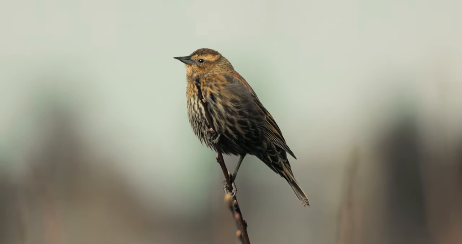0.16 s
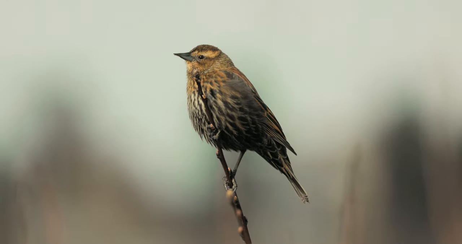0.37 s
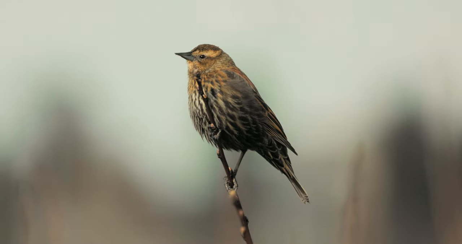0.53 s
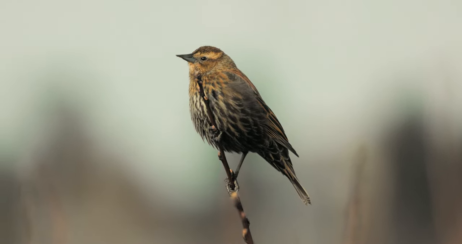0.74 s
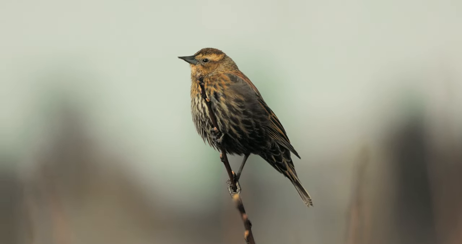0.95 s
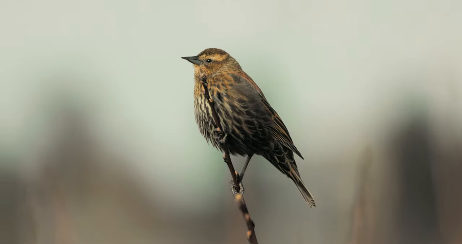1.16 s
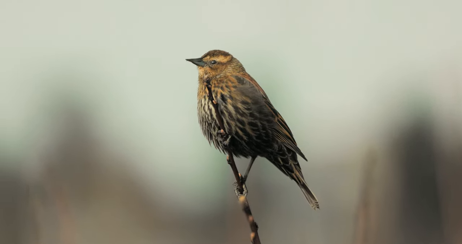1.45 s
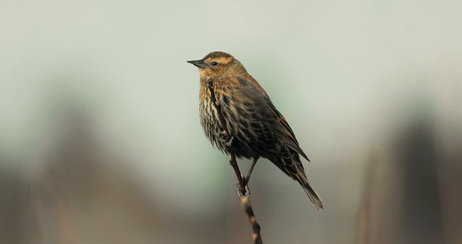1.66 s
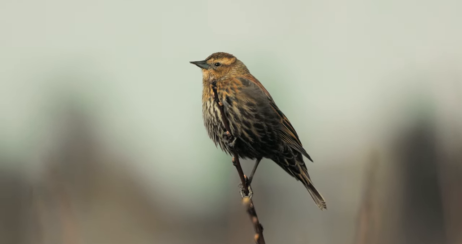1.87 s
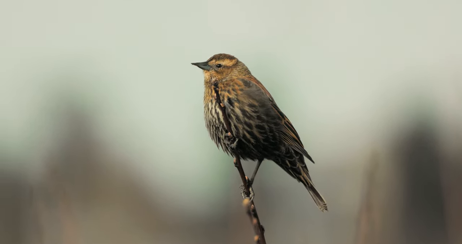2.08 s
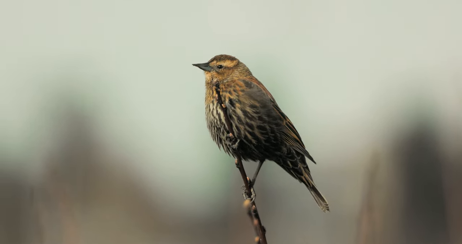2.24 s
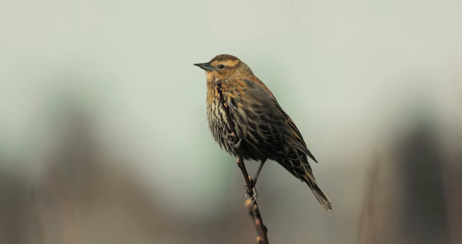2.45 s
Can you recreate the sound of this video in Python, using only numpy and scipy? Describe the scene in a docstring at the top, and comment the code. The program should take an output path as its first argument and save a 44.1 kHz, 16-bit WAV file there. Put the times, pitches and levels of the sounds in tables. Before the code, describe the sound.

Bird calls outdoors: crisp, very short falling chips in three groups to the right, with quick slurred whistles before, between and after, soft flat peeps and an early far trill; blurred tree echo, low rumble and faint hiss.

```python
"""A bird to the right gives groups of short falling chips, each a gliding tone with overtones and a little breath noise.
A warbler sings slurred whistles before, between and after them, pure tones gliding from point to point, and another
bird repeats one flat peep with an octave overtone. A far bird trills by repeating one swooping stroke. Trees scatter it
all back as a late blurred echo, made with fading noise, over the marsh's low rumble and soft hiss of filtered noise."""
import sys
import numpy as np
from scipy import signal
from scipy.fft import rfft, irfft
from scipy.io import wavfile
from scipy.ndimage import uniform_filter1d

SR = 44100
rng = np.random.default_rng(int(sys.argv[2]) if len(sys.argv) > 2 else 0)


def inscribe(sig):
    """Save sig as 16-bit PCM at rate SR to the path in sys.argv[1].

    A 1-D sig is mono; a 2-D sig holds one channel per row.
    Samples are clipped to [-1, 1] before scaling.
    """
    pcm = np.round(np.clip(np.atleast_2d(sig).T, -1, 1) * 32767)
    wavfile.write(sys.argv[1], SR, pcm.astype(np.int16))


N = 115101

# Levels in the bird tables are set before panning; a negative pan makes the right side louder.

# The marsh air's tone colour, thinned further below 20 Hz: pitch_hz, relative_level_db (per Hz)
AIR_COLOUR = [(12, -48), (20, -21), (40, 0.5), (75, 0), (233, -6.5), (302, -7), (527, -13.5), (671, -22.5),
              (839, -27.5), (1290, -30), (1700, -32.5), (2500, -30.5), (4000, -34.5), (5500, -38),
              (8500, -42), (11000, -43.5), (13500, -41), (15500, -46)]
# How alike the air sounds at left and right: pitch_hz, likeness (0 to 1)
AIR_LIKENESS = [(60, 0.5), (130, 0.76), (290, 1), (640, 0.78), (1410, 0.18), (3100, 0.39), (6820, 0.13),
                (15000, 0.071)]
# How much louder the air is at left than at right: pitch_hz, difference_db
AIR_BALANCE = [(25, -19), (60, 5), (125, 0.5), (500, -.5), (2000, -1.5), (12000, -1)]
AIR_DB = -49.5    # overall level of each side, before the balance

# Echo from the trees
ECHO_DELAY_S, ECHO_RISE_S, ECHO_HOLD_S = 0.024, 0.013, 0.091   # gap, swell, time before the decay
ECHO_T60_S = 0.8                          # time to fall by 60 dB after the hold
ECHO_CUT_HZ, ECHO_PAN_DB, ECHO_LIKENESS = 7100, -2.5, 0.79
SLAP_S, SLAP_DB = .115, -28.5             # one firmer reflection

# One stroke of the far trill, played 5% lower: share_of_period, pitch_hz
TRILL_STROKE = [(0, 7600), (.15, 8491), (0.362, 6095), (.5, 5394), (.62, 5905), (.8, 6306)]
# Loudness of the trill's strokes over time: start_s, level_db
TRILL_LEVEL = [(0, -71), (.1, -71), (.7, -72.5), (.83, -92)]
TRILL_START_S, TRILL_PERIOD_S = .02, .0572
TRILL_ECHO_DB, TRILL_PAN_DB = 8.5, 1
TRILL_RASP_DB, TRILL_RASP_HZ = 3.5, 720   # fast random roughness

# Flat peeps: start_s, length_s, pitch_hz, level_db, octave_db (relative to the first partial)
PEEPS = [(.038, 0.05, 2215, -58.5, -7), (.158, 0.076, 2194, -61, -11.5), (.228, 0.03, 2195, -74, -6),
         (.262, 0.024, 2200, -66, -16), (.303, .03, 2230, -77, -19), (.404, 0.056, 2207, -60.5, -5),
         (.512, 0.05, 2195, -76, 2), (0.565, 0.05, 2208, -67.5, -2.5), (.548, 0.055, 2205, -59, -14.5),
         (.625, 0.05, 2212, -67, -18), (.705, 0.12, 2195, -78, -16), (1.17, 0.051, 2230, -61, -13),
         (1.315, 0.05, 2200, -60, -13), (1.478, 0.075, 2201, -63, 1.5), (1.624, 0.068, 2174, -62, -19),
         (1.818, 0.06, 2197, -60, -18), (1.968, 0.1, 2179, -66, -27)]
PEEP_PAN_DB, PEEP_ECHO_DB, PEEP_FLUTTER_DB = -13.5, 0, 2.2

# Points along each slurred whistle, one list a note, played 1% lower: time_s, pitch_hz, level_db
WHISTLES = [
    [(0, 2160, -53), (.012, 1948, -61), (.03, 1810, -60)],
    [(.006, 3400, -61.5), (.018, 3710, -65)],
    [(.024, 2307, -56), (.034, 2890, -56), (.046, 3187, -59), (.058, 2930, -55), (.068, 2480, -48)],
    [(.215, 2485, -67), (.232, 3144, -65), (.245, 2930, -60), (.256, 2400, -58.5)],
    [(.306, 3770, -77), (.32, 3300, -80)],
    [(.333, 2980, -73), (.356, 3950, -73)],
    [(.405, 2664, -61), (.418, 3150, -66), (.432, 3000, -69), (.444, 2395, -54)],
    [(.446, 3470, -70), (.464, 3120, -58.5)],
    [(.482, 2910, -59), (.497, 2950, -60)],
    [(.495, 2510, -76), (.512, 2750, -59), (.538, 3530, -67), (.557, 3110, -68)],
    [(.513, 2466, -69), (.53, 2170, -62)],
    [(.61, 3080, -70.5), (.63, 2377, -76), (.645, 2030, -67)],
    [(.954, 2750, -61), (.965, 2900, -62)],
    [(.962, 2220, -72), (.982, 2310, -54), (.996, 2760, -42), (1.001, 2620, -48.5)],
    [(1, 2200, -54), (1.018, 2162, -61.5), (1.033, 1770, -61.5)],
    [(1.034, 2590, -47.5), (1.041, 3730, -53), (1.047, 3876, -48.5), (1.06, 3830, -55), (1.066, 3480, -47),
     (1.07, 2800, -58)],
    [(1.1, 2120, -58.5), (1.125, 2040, -52), (1.146, 1800, -54)],
    [(1.146, 2494, -55), (1.156, 2085, -53.5)],
    [(1.262, 1825, -62), (1.3, 1818, -64), (1.36, 1842, -76)],
    [(1.322, 2844, -58), (1.34, 2870, -63), (1.362, 3580, -66)],
    [(1.388, 3430, -77), (1.404, 2670, -57)],
    [(1.672, 3460, -56), (1.686, 3225, -48), (1.698, 3170, -47)],
    [(1.701, 3573, -54), (1.71, 3280, -48.5), (1.728, 3150, -47.5), (1.736, 2752, -41.5),
     (1.755, 2400, -54.5), (1.79, 2320, -63)],
    [(1.75, 3440, -64), (1.8, 3620, -57), (1.85, 3650, -53), (1.866, 3900, -52)],
    [(1.825, 2478, -58), (1.85, 2650, -51.5), (1.872, 2847, -42), (1.883, 3000, -52)],
    [(1.882, 3222, -46.5), (1.907, 3166, -45.5)],
    [(1.908, 3070, -64), (1.922, 2342, -48.5), (1.944, 1950, -64.5)],
    [(2.25, 2450, -57), (2.258, 3174, -65), (2.269, 3404, -50), (2.277, 2520, -54), (2.283, 2200, -68)],
    [(2.256, 3900, -52.5), (2.266, 4090, -57)],
    [(2.287, 2710, -61), (2.296, 2930, -44.5)],
    [(2.298, 3478, -61), (2.309, 3540, -54.5), (2.314, 2574, -65.5), (2.318, 2220, -45.5)],
    [(2.321, 2320, -54.5), (2.338, 1820, -69)],
    [(2.366, 2335, -54), (2.374, 2810, -45), (2.379, 2850, -49)],
    [(2.379, 3454, -42.5), (2.385, 3514, -53.5), (2.392, 3164, -46), (2.397, 2366, -51),
     (2.412, 2340, -56.5)],
    [(2.406, 4110, -48.5), (2.412, 3916, -73), (2.424, 2770, -51), (2.43, 2620, -58)],
]
# Points along each thin high warble, one list a note, played 1% lower: time_s, pitch_hz, level_db
WARBLES = [
    [(.09, 8700, -83), (.185, 9350, -76)],
    [(2.275, 7700, -82), (2.282, 8350, -64), (2.289, 8200, -85), (2.294, 6400, -68), (2.299, 8200, -79),
     (2.31, 8100, -69)],
    [(2.36, 7940, -70), (2.365, 8400, -67), (2.374, 6620, -66), (2.38, 8500, -63), (2.388, 8400, -67),
     (2.394, 7200, -74), (2.408, 7100, -69)],
]
WHISTLE_PAN_DB, WHISTLE_ECHO_DB, WHISTLE_FLUTTER_DB = -11.5, -1.5, 2
NOTE_EDGE_S = .003
FLUTTER_HZ = 90    # upper limit of the whistles' and peeps' unsteadiness

# Falling chips, pitches before the end bends: start_s, length_s, first_hz, last_hz, level_db
CHIPS = [(.871, 0.0094, 4810, 4400, -47), (.913, .011, 4900, 4350, -42.5), (0.947, .020, 4870, 4326, -40),
         (1.002, 0.0184, 4920, 4467, -38), (1.086, 0.018, 4826, 4390, -40.5),
         (1.212, 0.017, 4845, 4340, -41.5), (1.257, 0.019, 4926, 4330, -39.5),
         (1.584, .018, 4634, 4335, -42), (1.630, .020, 4910, 4364, -38), (1.687, .018, 4930, 4486, -38),
         (1.856, 0.015, 4560, 4350, -45), (1.894, .020, 4880, 4360, -39.5), (1.945, 0.02, 4943, 4480, -38)]
# Overtones of a chip: pitch_multiple, level_db, fade_db (lost along the chip)
CHIP_PARTIALS = [(1, -3, 2), (1.5, -31, 2), (2, -17, 6), (3, -20, 17)]
CHIP_ONSET_S, CHIP_ONSET_SHARE = 0.00023, 0.44    # abrupt start before the swell
CHIP_ATTACK, CHIP_RELEASE = 0.68, 0.12            # shares of the length; attack is a full climb from zero
CHIP_ENTRY_HZ, CHIP_EXIT_HZ, CHIP_BEND_S = 250, 450, .0008   # starts sharp, ends flat
CHIP_BREATH_DB, CHIP_PAN_DB, CHIP_ECHO_DB = -27, -10, -2
# Dry ticks of noise, levels before the noise is filtered: start_s, level_db
TICKS = [(0.841, -58), (1.55, -53.5), (1.561, -50)]
TICK_DECAY_S, TICK_LOW_HZ, TICK_HIGH_HZ = 0.0031, 3480, 8700
HAZE_START_S, HAZE_LENGTH_S, HAZE_DB = 1.575, .14, -65   # a soft hiss after the ticks

# How much later the left microphone hears each bird
CHIP_LAG_S, WHISTLE_LAG_S, PEEP_LAG_S = .000512, .0009, .00053
CUTOFF_HZ = 15800


def amp(db):
    """Turns decibels into a gain."""
    return 10 ** (np.asarray(db, float) / 20)


def at_hz(points, hz):
    """Reads a table at any pitch, spacing pitches by ratio as hearing does."""
    table_hz, values = np.transpose(points)
    return np.interp(np.log(hz), np.log(table_hz), values)


def add(track, start_s, sound):
    """Mixes a sound into a track, cutting what runs past the end."""
    i = max(int(start_s * SR), 0)
    track[i:i + len(sound)] += sound[:len(track) - i]


def tone(hz, partials):
    """Adds sine waves at multiples of a moving pitch."""
    phase = 2 * np.pi * np.cumsum(hz) / SR
    return sum(amp(db) * np.sin(multiple * phase) for multiple, db in partials)


def edges(t, rise_s, fall_s):
    """Fades a sound smoothly in and out."""
    nearest_edge = np.minimum(t / rise_s, (t[-1] - t) / fall_s)
    return np.sin(np.pi / 2 * np.clip(nearest_edge, 0, 1)) ** 2


def waver(depth_db, rate_hz):
    """A random gain that changes no faster than about rate_hz."""
    lowpass = signal.butter(2, rate_hz, fs=SR, output="sos")
    slow = signal.sosfilt(lowpass, rng.standard_normal(N))
    return amp(depth_db * slow / slow.std())


def pan(x, pan_db):
    """Places a sound by the level gap between left and right."""
    return x * amp([[pan_db / 2], [-pan_db / 2]])


def lag(x, lag_s):
    """Makes the left side late, as when sound reaches the right first."""
    turn = np.exp(-2j * np.pi * np.fft.rfftfreq(N, 1 / SR) * lag_s)
    return np.array([irfft(rfft(x) * turn, N), x])


def two_sides(mid, side, alike):
    """Blends shared noise and opposite noise to set how alike the two sides are."""
    return np.sqrt(1 + alike) * mid + np.sqrt(1 - alike) * side * [[1], [-1]]


def air():
    """Steady far rumble and hiss: noise coloured by pitch, most alike at both sides from about 290 to 640 Hz."""
    hz = np.maximum(np.fft.rfftfreq(N, 1 / SR), 1)
    mid, side = rfft(rng.standard_normal((2, N)), axis=1)
    alike = np.clip(at_hz(AIR_LIKENESS, hz), 0, 1)
    tilt = at_hz(AIR_BALANCE, hz) / 2
    colour = amp(at_hz(AIR_COLOUR, hz)) * np.minimum(hz / 20, 1) ** 2
    colour = colour / np.sqrt(2 * np.mean(colour ** 2))
    both = two_sides(mid, side, alike) * amp([tilt, -tilt])
    return amp(AIR_DB) * irfft(colour * both, N, axis=1)


def trees(x, alike):
    """Many scattered reflections, as noise that swells after a gap, holds and dies away."""
    t = np.arange(SR) / SR
    late = np.maximum(t - ECHO_DELAY_S, 0)
    swell = 1 - np.exp(-late / ECHO_RISE_S)
    shape = swell * amp(-60 * np.maximum(late - ECHO_HOLD_S, 0) / ECHO_T60_S)
    mid, side = rng.standard_normal((2, SR)) * shape / np.sqrt(2 * np.sum(shape ** 2))
    tail = two_sides(mid, side, alike)
    tail[:, int(SLAP_S * SR)] += amp(SLAP_DB)
    tail = signal.sosfilt(signal.butter(1, ECHO_CUT_HZ, fs=SR, output="sos"), tail)
    echo = signal.fftconvolve(x[None], tail, axes=1)[:, :N]
    return pan(echo, ECHO_PAN_DB)


def trill():
    """A far bird's swooping stroke, repeated steadily with small random changes of pitch and level."""
    share, hz = np.transpose(TRILL_STROKE)
    level_s, level_db = np.transpose(TRILL_LEVEL)
    out = np.zeros(N)
    starts = TRILL_START_S + TRILL_PERIOD_S * np.arange(-6, 14)
    wobbles = rng.normal(0, 1, (20, 2))
    t = np.arange(0, share[-1] * TRILL_PERIOD_S, 1 / SR)
    for start_s, (pitch_wobble, level_wobble) in zip(starts, wobbles):
        pitch = np.interp(t / TRILL_PERIOD_S, share, hz) * (1 + .015 * pitch_wobble)
        db = np.interp(start_s, level_s, level_db) + 1.1 * level_wobble
        stroke = edges(t, 0.0074, 0.0028) * tone(pitch, [(0.95, 0)])
        # placed one second late, leaving room for strokes before the scene begins
        add(out, start_s + 1, amp(db) * stroke)
    return out


def far_trill():
    """The rough trill and its stronger echo, scattered independently to each side."""
    dry_trill = trill() * waver(TRILL_RASP_DB, TRILL_RASP_HZ)
    both = pan(dry_trill + amp(TRILL_ECHO_DB) * trees(dry_trill, 0), TRILL_PAN_DB)
    # drop the spare first second, so the echo is already under way
    return np.pad(both[:, SR:], ((0, 0), (0, SR)))


def peeps():
    """Notes held at one pitch, each with an octave overtone."""
    out = np.zeros(N)
    for start_s, length_s, hz, db, octave_db in PEEPS:
        t = np.arange(0, length_s, 1 / SR)
        note = tone(np.full(len(t), hz), [(1, 0), (2, octave_db)])
        add(out, start_s, amp(db) * edges(t, 0.0023, 0.0097) * note)
    return out


def slurs(notes):
    """Whistles and warbles: pure tones whose pitch and level glide through their points."""
    out = np.zeros(N)
    for note in notes:
        s, hz, db = np.transpose(note)
        t = np.arange(s[0] - NOTE_EDGE_S / 2, s[-1] + NOTE_EDGE_S / 2, 1 / SR)
        # rounding the corners of the glide over 131 samples
        pitch = uniform_filter1d(np.interp(t, s, hz), size=131, mode="nearest")
        shape = amp(np.interp(t, s, db)) * edges(t - t[0], NOTE_EDGE_S, NOTE_EDGE_S)
        add(out, t[0], shape * tone(pitch, [(0.99, 0)]))
    return out


def ticks_and_haze(white):
    """Filtered noise: a few quickly fading ticks and one soft swell of hiss."""
    out = np.zeros(N)
    band = signal.butter(2, (TICK_LOW_HZ, TICK_HIGH_HZ), "band", fs=SR, output="sos")
    hiss = signal.sosfilt(band, white)
    t = np.arange(0, HAZE_LENGTH_S, 1 / SR)
    add(out, HAZE_START_S, amp(HAZE_DB) * edges(t, 0.016, 0.085) * hiss[:len(t)])
    t = np.arange(441) / SR
    for start_s, db in TICKS:
        noise = hiss[int(start_s * SR):][:len(t)]
        add(out, start_s, amp(db) * np.exp(-t / TICK_DECAY_S) * noise)
    return out


def chips():
    """Short falling notes with fading overtones and breath noise, joined by ticks and a soft hiss."""
    white = rng.standard_normal(N)
    out = ticks_and_haze(white)
    for start_s, length_s, first_hz, last_hz, db in CHIPS:
        t = np.arange(0, length_s, 1 / SR)
        fall = first_hz + (last_hz - first_hz) * t / length_s
        entry = CHIP_ENTRY_HZ * np.exp(-t / CHIP_BEND_S)
        leave = CHIP_EXIT_HZ * np.exp((t - length_s) / CHIP_BEND_S)
        swell = np.minimum(CHIP_ONSET_SHARE + t / (CHIP_ATTACK * length_s), 1)
        shape = edges(t, CHIP_ONSET_S, CHIP_RELEASE * length_s) * swell
        partials = [(k, p_db - fade_db * t / length_s) for k, p_db, fade_db in CHIP_PARTIALS]
        breath = amp(CHIP_BREATH_DB) * white[int(start_s * SR):][:len(t)]
        add(out, start_s, amp(db) * shape * (tone(fall + entry - leave, partials) + breath))
    return out


def scene():
    """Each bird heard directly and through the trees, over the marsh air."""
    chipping = chips()
    whistling = slurs(WHISTLES + WARBLES) * waver(WHISTLE_FLUTTER_DB, FLUTTER_HZ)
    peeping = peeps() * waver(PEEP_FLUTTER_DB, FLUTTER_HZ)
    birds = [(chipping, CHIP_PAN_DB, CHIP_LAG_S, CHIP_ECHO_DB),
             (whistling, WHISTLE_PAN_DB, WHISTLE_LAG_S, WHISTLE_ECHO_DB),
             (peeping, PEEP_PAN_DB, PEEP_LAG_S, PEEP_ECHO_DB)]
    direct = sum(pan(lag(x, lag_s), pan_db) for x, pan_db, lag_s, _ in birds)
    into_trees = sum(x * amp(echo_db) for x, _, _, echo_db in birds)
    echo = trees(into_trees, ECHO_LIKENESS)
    return direct + echo + far_trill() + air()


def record(dry):
    """A steep filter removes the very highest pitches."""
    return signal.sosfilt(signal.ellip(12, .5, 70, CUTOFF_HZ, fs=SR, output="sos"), dry)


dry = scene()
out = record(dry)
inscribe(out)
```